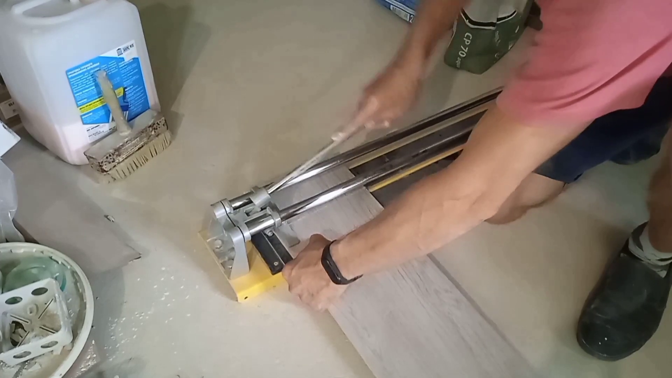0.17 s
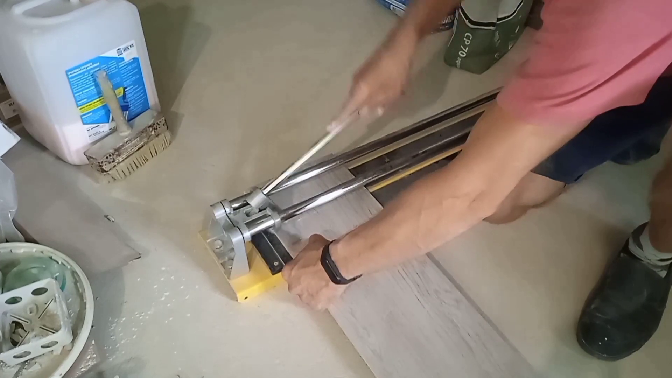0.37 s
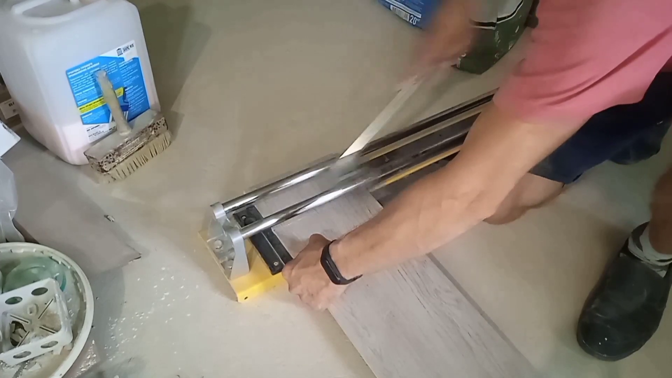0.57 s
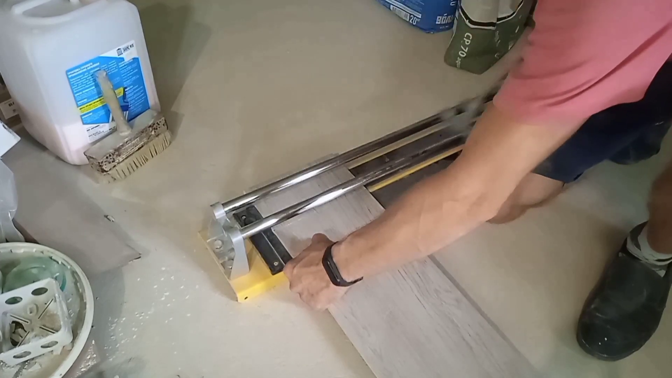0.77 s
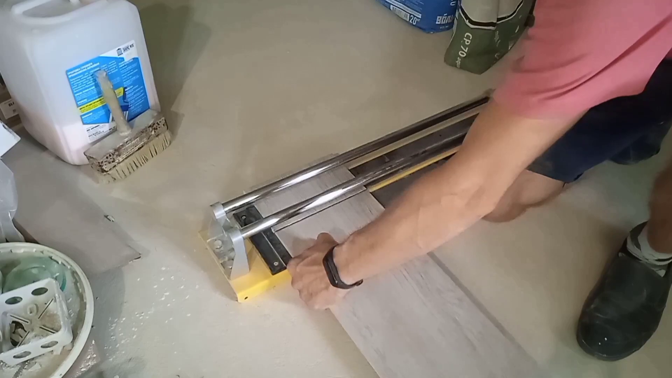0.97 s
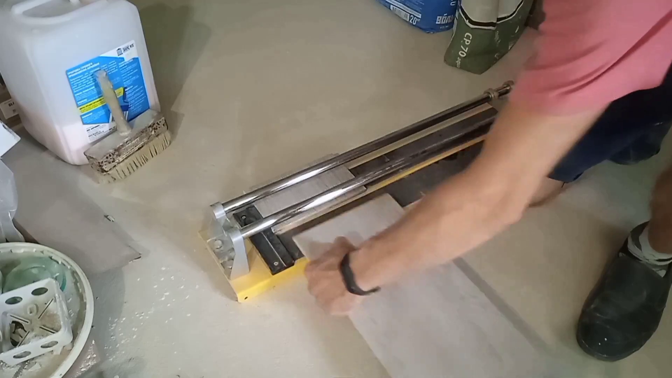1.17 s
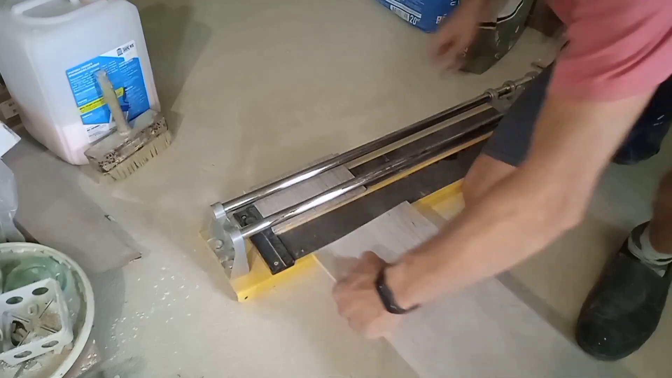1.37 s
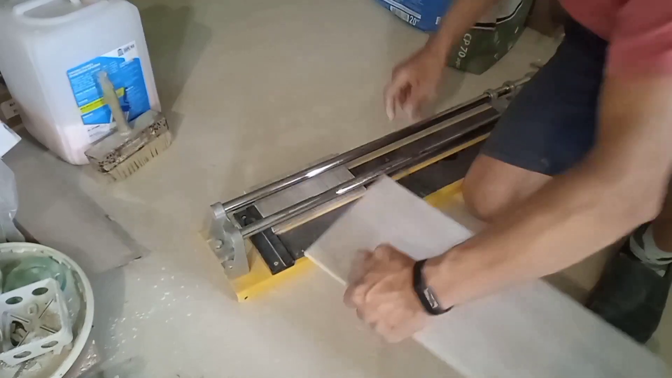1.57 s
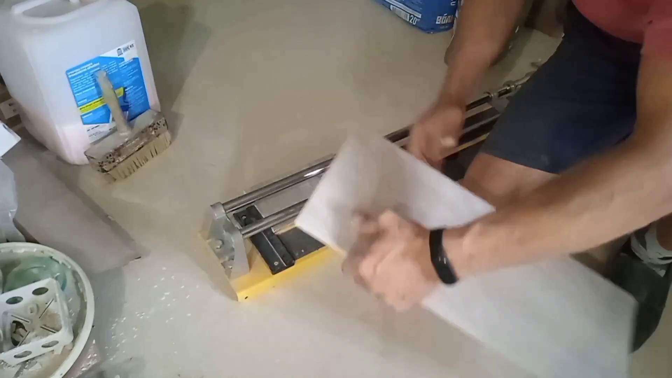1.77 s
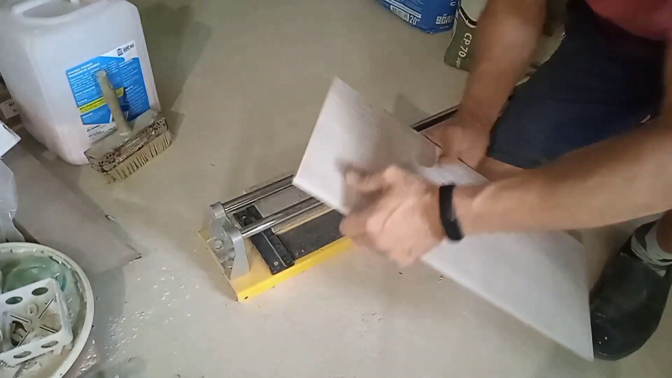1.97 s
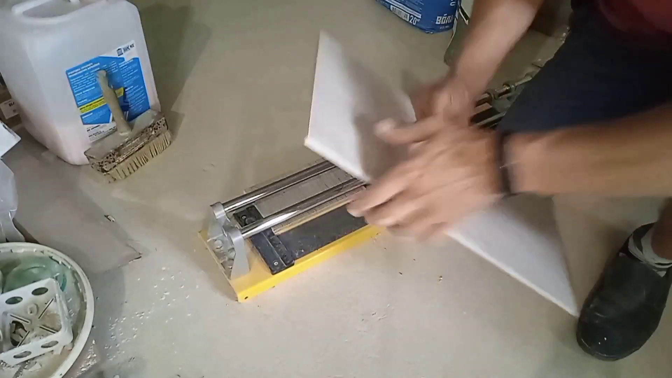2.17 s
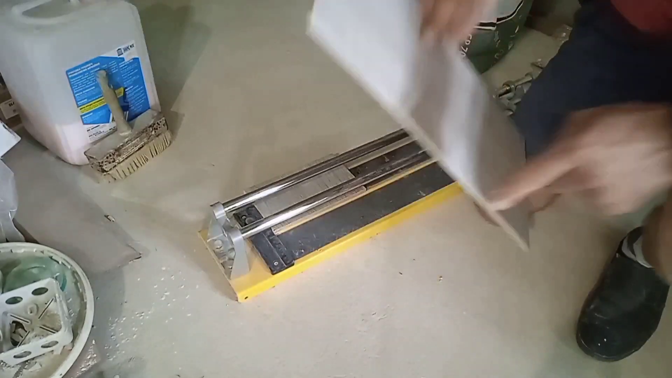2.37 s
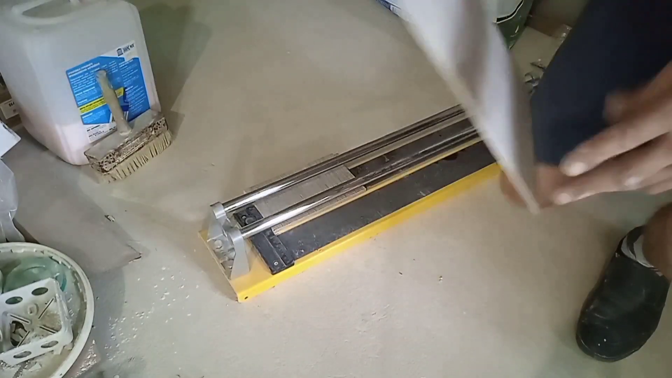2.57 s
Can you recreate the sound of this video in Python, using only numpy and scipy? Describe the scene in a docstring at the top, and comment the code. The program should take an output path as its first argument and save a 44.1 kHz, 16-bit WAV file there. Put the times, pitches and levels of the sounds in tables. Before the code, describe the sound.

A tile snaps on a hand cutter with a loud, hard crack and slap, ringing in a bare room; the carriage slides back faintly, rattles to a stop, then the cut piece knocks on the bed.

```python
"""A hand tile cutter on the floor of a bare room, each blow a noise crack, damped modes and a room tail.
Over low rumble, hiss and a dying echo, a scored tile snaps and its halves slap down.
The carriage then slides back on steel rails as a gliding narrow-band whine, and rattles to rest.
The cut tile next knocks and bounces on the bed, amid rubbing noise from its handling.
Faint squeaks of drifting partials follow; tiny dry ticks of one or two damped modes are scattered throughout."""
import sys
import numpy as np
from scipy import signal
from scipy.fft import irfft
from scipy.io import wavfile
from scipy.ndimage import uniform_filter1d

SR = 44100
rng = np.random.default_rng(int(sys.argv[2]) if len(sys.argv) > 2 else 0)


def generate_wav(signal):
    """Clip the signal to [-1, 1] and save it as 16-bit WAV at the path in sys.argv[1]."""
    frames = np.transpose(np.atleast_2d(signal))
    scaled = np.clip(frames, -1, 1) * 32767
    pcm = np.round(scaled).astype(np.int16)
    wavfile.write(sys.argv[1], SR, pcm)


N = 114660
T = np.arange(N) / SR  # time/s

# COLOUR tables are relative power densities: f/Hz, level/dB per Hz.
# MODES tables are resonances: f/Hz, level/dB, line width/Hz.
# Room decay: f/Hz, T60/s
ROOM = [(100, 0.96), (250, 0.72), (600, 0.63), (1500, 0.69), (3000, 0.7), (5000, 0.67), (7500, 0.59),
        (11000, 0.51), (15500, 0.365)]
# Low rumble: t/s, level/dB; then its colour
RUMBLE = [(0, -66.5), (.4, -72), (.7, -71), (1.1, -76), (1.7, -74), (1.85, -73), (2.1, -72), (2.25, -79),
          (2.42, -65.5), (2.6, -66.5)]
RUMBLE_COLOUR = [(20, -62), (55, -20.5), (85, 5.5), (110, -9), (170, -23.5), (600, -63)]
# Colour of the faint steady hiss: f/Hz, level/dB per Hz
AIR_COLOUR = [(20, -28), (35, -21), (55, -11.5), (86, -10.5), (113, -6), (180, -8.5), (240, -10),
              (340, -10.5), (500, -13.5), (700, -16.5), (1000, -19), (1500, -20.5), (2000, -22.5),
              (3000, -25), (4500, -32), (6500, -34.5), (8300, -45), (13700, -42.5), (15000, -30.5),
              (15500, -38.5)]
# Colour of the reverberation dying away at the start: f/Hz, level/dB per Hz
ECHO_COLOUR = [(100, -11), (300, -4), (700, -0.5), (2200, -1), (3500, -13.5), (7000, -15), (8500, -29.5),
               (15000, -45)]
# Hands, cloth and tile edge rubbing: t/s, level/dB; then its colour
RUB = [(1.14, -78), (1.195, -54.5), (1.22, -57), (1.26, -77), (1.7, -84), (1.9, -72.5), (2.05, -80),
       (2.2, -78.5), (2.3, -82), (2.4, -75), (2.5, -81), (2.59, -67.5)]
RUB_COLOUR = [(60, -17), (200, -3), (400, 5), (800, -8.5), (1500, 2.5), (3000, -9.5), (6000, -17),
              (9000, -32), (15000, -40)]
# Squeaks of the handled piece: t/s, length/s, level/dB
SQUEAKS = [(1.83, .17, -68.5), (2.17, 0.084, -66)]
# Modes of tiny dry ticks, near-simultaneous rows forming one tick: t/s, f/Hz, level/dB, rise/s
TICK_MODES = [(0.2165, 5770, -58, 0.00025), (0.4843, 5600, -38, 0.00025), (0.8504, 1780, -44, 0.0015),
              (.8563, 4170, -49, 0.00036), (1.161, 6900, -59, 0.00039), (1.728, 4000, -54, 0.00022),
              (2.0318, 4010, -36.5, 0.00064), (2.0343, 3940, -45, 0.00046), (2.458, 2440, -56, 0.00057),
              (2.5906, 1660, -51, 0.0015), (2.5908, 3000, -55.5, .001)]
# Colour of the ticks' dry edge: f/Hz, level/dB per Hz
TICK_EDGE_COLOUR = [(500, -25), (2000, -2), (4500, -6), (7000, -2.5), (8200, -24), (9700, -12),
                    (11000, -30)]
# Carriage sliding on the rails: t/s, level/dB, whine f/Hz
SLIDE = [(.48, -69, 3700), (0.589, -72.5, 4000), (.69, -77, 3510), (.75, -80, 3640), (.79, -83, 3300),
         (.87, -72.5, 3640), (0.971, -70, 3770), (1.061, -77.5, 3240), (1.17, -79, 3220)]
# Treble of the rails: t/s, level/dB; then the colour of its hiss
RAIL_TREBLE = [(.5, -74), (.62, -75.5), (.72, -66.5), (.8, -74.5), (.9, -71), (1.02, -73), (1.15, -82)]
RAIL_HISS_COLOUR = [(3000, -5.5), (9000, -13), (10000, -25), (10200, -5), (10600, -12), (11500, -13),
                    (15000, -27)]
# Carriage and lever rattling: t/s, level/dB, treble tilt/dB per octave; then colour and steel modes
CLINKS = [(0.8694, -13, -1), (0.8991, -12.5, 2), (0.9215, -7, 3), (0.9636, 0.5, -0.5), (0.9981, -4.5, -0.5)]
CLINK_COLOUR = [(150, -30), (280, -4), (360, -2), (550, -15), (950, 0.5), (1400, -1.5), (1750, -7),
                (2100, 0), (2700, -7.5), (3600, -7), (4800, -15), (5400, -15), (7200, -23), (9000, -17),
                (12000, -44), (15000, -29.5)]
CLINK_MODES = [(356, -57, 15), (677, -56, 19.4), (1110, -58, 19), (1523, -57, 9.2), (2015, -58, 89),
               (2420, -63, 30), (4080, -75, 20), (4450, -66, 8.9), (4870, -70, 53), (4900, -63, 46),
               (5570, -74, 40), (5916, -60.5, 47), (6450, -75, 49), (6580, -67, 43.7), (7080, -65, 87),
               (7000, -60, 43), (7900, -66.5, 85), (8700, -83, 35), (9113, -81, 32)]
# Cut tile knocking on the bed: t/s, level/dB; then colour and tile modes
KNOCKS = [(1.1995, -12.5), (1.2531, 2), (1.268, -10), (1.287, -6)]
KNOCK_COLOUR = [(40, -55), (90, -23.5), (156, -4), (192, -29), (250, -1), (300, -15.5), (368, 0), (520, -8),
                (620, -5.5), (850, -6.5), (1150, -7.5), (1400, -8.5), (1650, -9), (2150, -6.5),
                (2600, -9.5), (3100, -10.5), (4100, -13), (5000, -12), (6000, -13), (7600, -17),
                (9000, -27.5), (9500, -35), (11000, -31), (13200, -40), (15000, -27), (15500, -34)]
KNOCK_MODES = [(227.8, -49, 3.1), (584, -45, 4.7), (840, -42.5, 8.4), (1322, -43.5, 3.9), (1377, -38.5, 17),
               (1813, -76, 4), (2163, -41.5, 26), (2670, -55, 4.4), (2924, -44.5, 17), (3590, -48, 16),
               (4931, -48, 7.7), (5970, -46.5, 16), (5980, -46.5, 13), (7628, -51, 11.4),
               (9100, -54.5, 9.3), (13754, -69, 6.5)]
# Snap, then the halves striking the bed: t/s, level/dB; then colour and modes of frame and tile
SNAPS = [(0.2431, -0.5), (.2540, -6)]
SNAP_COLOUR = [(40, -54.5), (90, -26), (150, -6.5), (190, -16.5), (260, -11.5), (335, -9), (450, -5),
               (570, -13.5), (660, -1.5), (820, -7.5), (980, -7.5), (1160, -16), (1330, -7), (1600, -7),
               (2000, -7), (2530, -11), (3120, -9.5), (3900, -20.5), (4900, -18), (6400, -19), (7400, -11),
               (8100, -24), (8900, -23), (10300, -38), (13800, -42), (15000, -25), (15500, -25.5)]
SNAP_MODES = [(228, -39, 3), (379, -41, 6), (430, -37, 8), (465, -40, 8), (516, -35.5, 4), (636, -40, 5),
              (660, -40, 8), (875, -41, 6), (926, -35.5, 4), (995, -41, 12), (1062, -39, 6), (1351, -41, 4),
              (1505, -41, 5), (1643, -42, 6), (1988, -37.5, 10), (2383, -39.5, 4), (3131, -41, 10),
              (3531, -44, 20), (4220, -49, 10), (4801, -46, 15), (4972, -47, 15), (5544, -46, 10),
              (5938, -40, 6), (6807, -38, 10), (7157, -41, 8), (7445, -42, 15)]
# First sharp push of the break and of the slap: t/s, level/dB, f/Hz
SHOCKS = [(0.2421, -14.5, 2450), (0.254, -9.5, 1874)]


def amp(db):
    """Decibel law: level/dB to amplitude gain."""
    return 10 ** (np.asarray(db) / 20)


def unit(x):
    """Normalisation to a root mean square of 1."""
    return x / np.sqrt(np.mean(x ** 2) + 1e-20)


def read(points, hz):
    """Interpolation of a spectral table along a logarithmic frequency axis."""
    f, value = np.transpose(points)
    return np.interp(np.log(hz + 1), np.log(f + 1), value)


def level_curve(points, before=None, after=None):
    """Linear interpolation of level/dB in time; end values hold unless others are given."""
    return np.interp(T, *np.transpose(points), left=before, right=after)


def add(mix, s, sound):
    """Superposition: sums a sound into the mix from time s."""
    part = mix[max(round(s * SR), 0):][:len(sound)]
    part += sound[:len(part)]


def wander(count, size):
    """Low-pass random process of rms 1: white noise averaged twice over size samples."""
    white = rng.standard_normal(count)
    return unit(uniform_filter1d(uniform_filter1d(white, size), size))


def noise(colour, tilt_db=0, bumps=0):
    """Stationary noise by random-phase synthesis, with tilt/dB per octave and optional bumps/dB."""
    hz = np.fft.rfftfreq(N, 1 / SR)
    tilt = tilt_db * np.log2((hz + 100) / 2000)
    gain = amp(read(colour, hz) + tilt + bumps)
    phase = 2 * np.pi * rng.random(len(hz))
    return unit(irfft(gain * np.exp(1j * phase), N))


def tone(hz, width, count):
    """Line broadening: random phase drift spreads a partial over the given width/Hz."""
    drift = np.cumsum(rng.standard_normal(count)) * np.sqrt(2 * np.pi * abs(width) / SR)
    cycles = np.cumsum(hz * np.ones(count)) / SR + rng.random()
    return np.sin(2 * np.pi * cycles + uniform_filter1d(drift, size=80))


def die_away(x, bass_rise_s=0.021):
    """Frequency-dependent absorption: each band decays at the room's rate, and bass builds more slowly."""
    hz, t, z = signal.stft(x, SR, nperseg=512, noverlap=384)
    hz = hz[:, None]
    # bass_rise_s is the time constant at 250 Hz
    build = 1 - np.exp(-(t + 0.00067) * (hz + 50) / (300 * bass_rise_s))
    decay = amp(-60 * t / read(ROOM, hz))
    return signal.istft(z * build * decay, SR, nperseg=512, noverlap=384)[1][:N]


def reverb(x, extra_t60):
    """Diffuse reverberation: convolution with a unit-energy noise tail, damped beyond the room's own decay."""
    tail = die_away(rng.standard_normal(N)) * amp(-60 * T / extra_t60)
    return signal.fftconvolve(x, tail / np.linalg.norm(tail))[:N]


def lesser_modes(depth_db):
    """Modal density: weak modes as random spectral bumps about 100 Hz apart, shared by an object's blows."""
    return depth_db * wander(N // 2 + 1, size=130)


def blow(colour, bumps, crack_db, crack_t60, crack_tilt_db, room_db, room_rise_s, tilt_db=0):
    """Impact excitation: a crack of dense short modes, then the room's answer."""
    crack = amp(crack_db - 60 * T / crack_t60) * noise(colour, crack_tilt_db + tilt_db, bumps)
    build = 1 - np.exp(-T / room_rise_s)
    room = amp(room_db) * build * die_away(noise(colour, tilt_db, bumps))
    return (crack + room) * np.minimum(T / .0003, 1)  # 0.3 ms onset


def ring(blows, modes, ring_db, t60, onset_db, onset_t60, waver_db, rise_cycles=3):
    """Modal superposition: blows add energy to wavering modes with a fast and a slow decay."""
    out, t = np.zeros(N), T[:SR]
    for hz, db, width in modes:
        mode_t60 = t60 * read(ROOM, hz) / read(ROOM, 970)  # t60 holds at 970 Hz
        fade = amp(-60 * t / mode_t60) + amp(onset_db - 60 * t / onset_t60)
        shape = fade * (1 - np.exp(-t * hz / rise_cycles))
        energy = np.zeros(N)
        for s, level, *tilt in blows:
            tilted = level + sum(tilt) * np.log2(hz / 3000)
            add(energy, s, (amp(tilted) * shape) ** 2)
        gain = amp(ring_db + db + waver_db * wander(N, size=900))
        out += np.sqrt(energy) * gain * tone(hz, width, N)
    return out


def air(hiss_db=-64.5, echo_db=-59.5, echo_t60=0.72):
    """Stationary hiss and varying rumble, with an exponential remnant of earlier reverberation."""
    rumble = amp(level_curve(RUMBLE)) * noise(RUMBLE_COLOUR)
    hiss = amp(hiss_db) * noise(AIR_COLOUR)
    echo = amp(echo_db - 60 * T / echo_t60) * noise(ECHO_COLOUR)
    return rumble + hiss + echo


def rub(rough_db=2.85):
    """Dry friction of hands, cloth and tile edge: coloured noise of randomly uneven level."""
    level = level_curve(RUB, before=-140) + rough_db * wander(N, size=350)
    return amp(level) * noise(RUB_COLOUR)


def squeaks(hz=1480, width_hz=20, octave_db=-9):
    """Frictional oscillation: soft narrow-band tones with a weak octave."""
    out = np.zeros(N)
    for s, length, db in SQUEAKS:
        n = int(length * SR)
        octave = amp(octave_db) * tone(2 * hz, 2 * width_hz, n)
        add(out, s, amp(db) * np.hanning(n) * (tone(hz, width_hz, n) + octave))
    return out


def ticks(edge_db=-17, edge_t60=0.011, room_db=-16):
    """Heavy damping: each tick is one or two short modes with a faint dry edge and little reverberation."""
    out, t = np.zeros(N), T[:1500]
    edge = amp(edge_db - 60 * t / edge_t60) * noise(TICK_EDGE_COLOUR)[:len(t)]
    for s, hz, db, rise in TICK_MODES:
        pulse = (t / rise * np.exp(1 - t / rise)) ** 2  # peaks at t = rise
        add(out, s, amp(db) * (edge + pulse * np.sin(2 * np.pi * hz * t)))
    return out + amp(room_db) * reverb(out, extra_t60=.5)


def slide(width_hz=130, rough_db=3, direct_db=-5, room_db=-2, high_db=-13, high_hz=10230,
          high_width_hz=110, hiss_db=-3.5):
    """Sliding friction: a gliding whine smeared by the room, a high whine of fixed pitch, and hiss."""
    s, db, hz = np.transpose(SLIDE)
    level = amp(np.interp(T, s, db, left=-140, right=-140))
    roughness = amp(rough_db * wander(N, size=300))
    whine = level * roughness * unit(tone(np.interp(T, s, hz), width_hz, N))
    high_whine = amp(high_db) * unit(tone(high_hz, high_width_hz, N))
    hiss = amp(hiss_db) * noise(RAIL_HISS_COLOUR)
    treble = amp(level_curve(RAIL_TREBLE, before=-140, after=-140)) * (high_whine + hiss)
    return amp(direct_db) * whine + amp(room_db) * reverb(whine, extra_t60=1.5) + treble


def clinks():
    """Repeated impact: carriage and lever rattle, each blow with its own spectral tilt."""
    out = ring(CLINKS, CLINK_MODES, ring_db=-6.5, t60=.5, onset_db=10.5, onset_t60=0.041, waver_db=0.5)
    bumps = lesser_modes(depth_db=1.5)
    for s, db, tilt in CLINKS:
        hit = blow(CLINK_COLOUR, bumps, crack_db=-53, crack_t60=0.046, crack_tilt_db=9.0,
                   room_db=-58.5, room_rise_s=0.004, tilt_db=tilt)
        add(out, s, amp(db) * hit)
    return out


def knocks():
    """Impact and rebound: the loose tile touches, drops on the bed and bounces, exciting its modes."""
    out = ring(KNOCKS, KNOCK_MODES, ring_db=-6.0, t60=0.59, onset_db=-21, onset_t60=0.041, waver_db=4.0)
    bumps = lesser_modes(depth_db=1.5)
    for s, db in KNOCKS:
        hit = blow(KNOCK_COLOUR, bumps, crack_db=-35.0, crack_t60=0.053, crack_tilt_db=0.5,
                   room_db=-37.5, room_rise_s=.006)
        add(out, s, amp(db) * hit)
    return out


def snap():
    """Brittle fracture: the break along the score shakes the cutter's modes, and the halves slap down."""
    out = ring(SNAPS, SNAP_MODES, ring_db=-5.5, t60=.74, onset_db=5, onset_t60=0.13, waver_db=2.5)
    bumps = lesser_modes(depth_db=1.5)
    for s, db in SNAPS:
        hit = blow(SNAP_COLOUR, bumps, crack_db=-24.5, crack_t60=0.063, crack_tilt_db=3.5,
                   room_db=-28, room_rise_s=0.011)
        add(out, s, amp(db) * hit)
    for s, db, hz in SHOCKS:
        cycles = T[:200] * hz
        push = cycles * np.exp(1 - 2 * cycles) * np.sin(2 * np.pi * cycles)
        add(out, s, amp(db) * push)
    return out


def scene():
    """Superposition of all sources, identical in both channels."""
    mono = air() + rub() + squeaks() + ticks() + slide() + clinks() + knocks() + snap()
    return np.array([mono, mono])


def record(dry, low_cut_hz=35, edge_hz=15600):
    """Linear filtering: the microphone's bass roll-off and the recorder's band limit."""
    high_pass = signal.butter(3, low_cut_hz, "high", fs=SR, output="sos")
    thin = signal.sosfilt(high_pass, dry)
    low_pass = signal.firwin(255, edge_hz, window=("kaiser", 8), fs=SR)
    return signal.oaconvolve(thin, low_pass[None], "same")


dry = scene()
out = record(dry)
generate_wav(out)
```